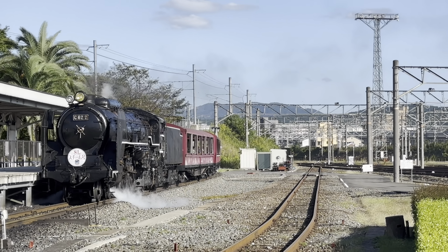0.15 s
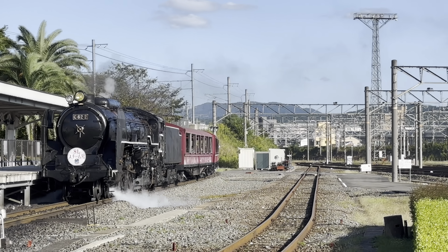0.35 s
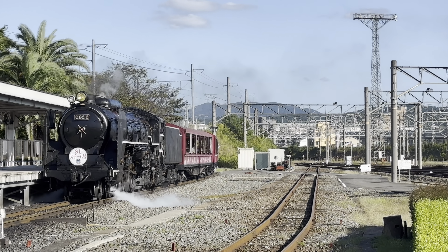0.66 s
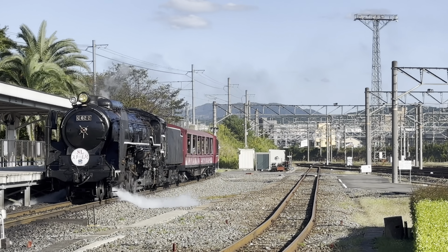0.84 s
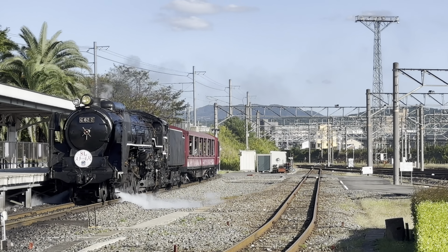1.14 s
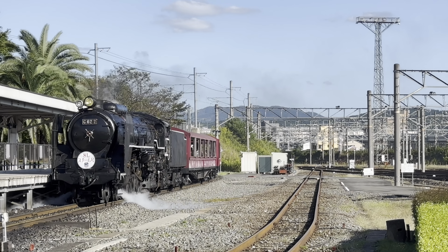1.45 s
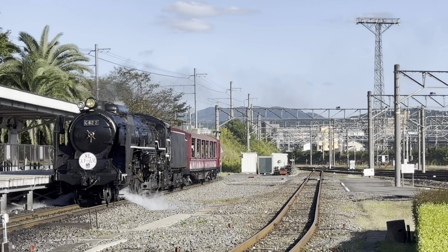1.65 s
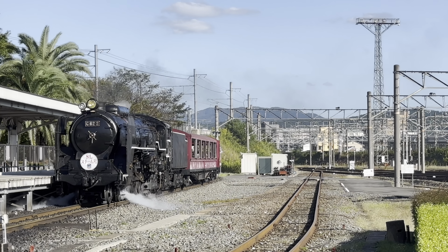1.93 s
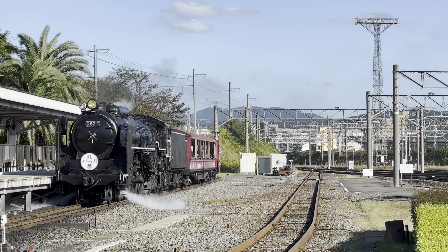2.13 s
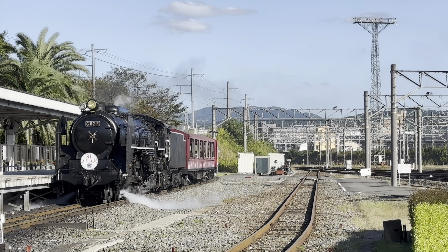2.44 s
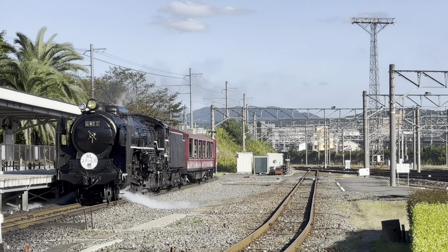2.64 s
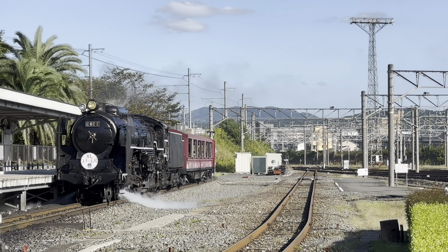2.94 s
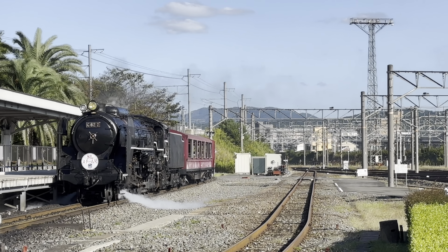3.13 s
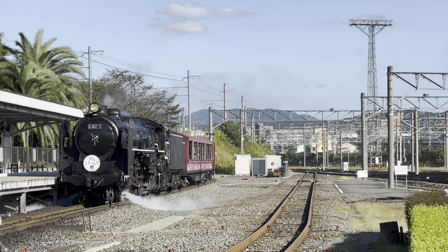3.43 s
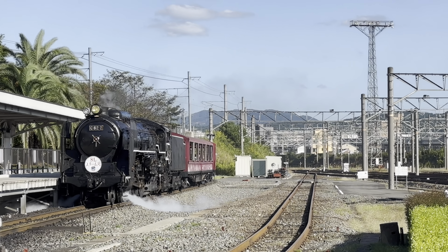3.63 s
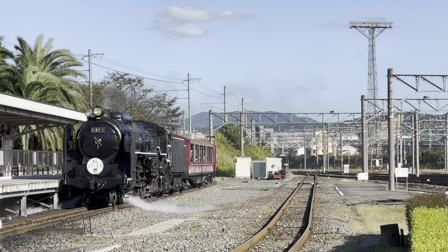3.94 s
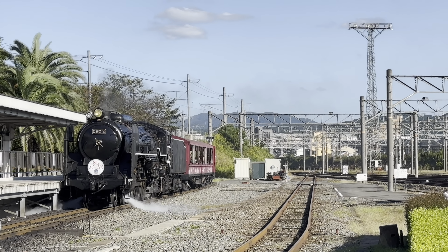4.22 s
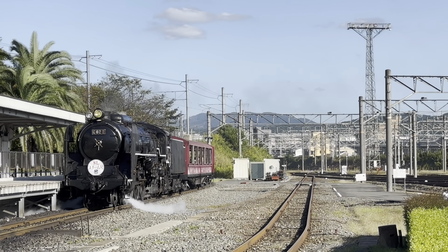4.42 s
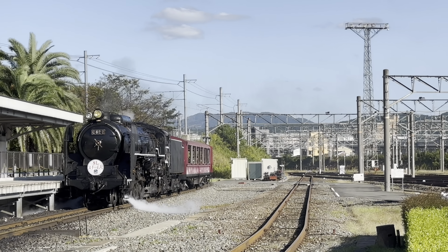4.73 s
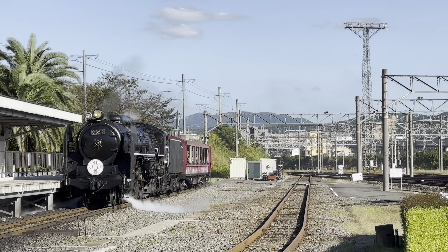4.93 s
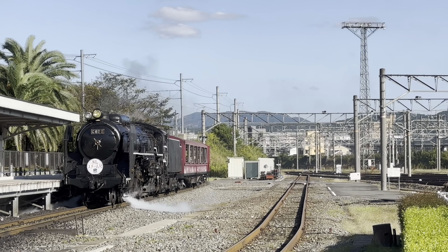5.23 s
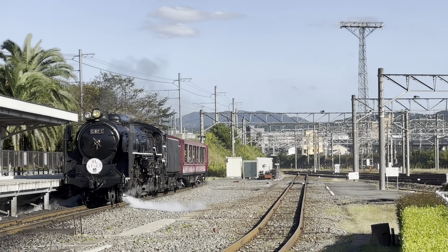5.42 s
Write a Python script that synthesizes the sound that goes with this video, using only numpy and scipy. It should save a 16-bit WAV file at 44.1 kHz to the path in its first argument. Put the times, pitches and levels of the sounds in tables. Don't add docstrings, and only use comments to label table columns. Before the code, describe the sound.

Steady bright steam hiss from a slowly rolling locomotive outdoors, with irregular low wind thumps on the microphone growing stronger toward the end.

```python
import sys
import numpy as np
from scipy import signal
from scipy.fft import rfft, irfft
from scipy.io import wavfile
from scipy.ndimage import uniform_filter1d

SR = 44100
rng = np.random.default_rng(int(sys.argv[2]) if len(sys.argv) > 2 else 0)


def log_audio(samples):
    frames = np.atleast_2d(samples).T
    limited = np.clip(frames, -1, 1)
    pcm = np.round(limited * 32767).astype(np.int16)
    wavfile.write(sys.argv[1], SR, pcm)


def nominal_scale(level):
    x = np.asarray(level, float) / 20
    return 10 ** x


N = 245725

# start in seconds, length in seconds, slap level in dB, rumble level in dB.
GUSTS = [(0.072, 0.017, -45, -25.5), (0.715, 0.083, -33, -28), (0.853, .025, -37.5, -38),
         (0.96, 0.017, -43, -37), (1.103, 0.0485, -36, -30), (1.441, 0.03, -44, -28),
         (1.559, 0.013, -30.5, -29), (2.028, 0.028, -35.5, -38), (2.102, 0.01, -35.5, -32.5),
         (2.191, .035, -34, -31), (2.472, 0.011, -30, -31), (2.601, 0.02, -39, -30),
         (2.727, 0.023, -41.5, -40), (3.171, 0.086, -41.5, -41), (3.48, 0.039, -39, -46),
         (3.601, 0.0945, -33, -22.5), (3.79, 0.14, -27.5, -15.5), (3.947, 0.051, -29, -25.5),
         (4.167, 0.085, -37, -28), (4.289, .065, -39.5, -30.5), (4.401, 0.012, -32, -39),
         (4.548, 0.13, -29, -25), (4.713, 0.039, -27.5, -24), (4.803, 0.023, -34.5, -27),
         (4.917, .06, -28.5, -25), (5.07, .03, -29.5, -26), (5.215, 0.025, -20, -16),
         (5.296, 0.043, -24, -19.5), (5.382, .035, -37, -23), (5.458, .065, -25, -13.5)]


def evened(x):
    return x / np.sqrt(np.mean(x ** 2) + 1e-20)


def read(points, hz):
    f, value = np.transpose(points)
    return np.interp(np.log(hz + 1), np.log(f + 1), value)


def smoothed(x, size, axis=-1):
    return uniform_filter1d(uniform_filter1d(x, size, axis=axis), size, axis=axis)


def lumps(seconds):
    return evened(smoothed(rng.standard_normal(N), max(int(seconds * SR), 1)))


def add(mix, s, sound):
    part = mix[:, round(s * SR):][:, :sound.shape[1]]
    part += sound[:, :part.shape[1]]


def steam(patchy_db=1.28, flicker_db=0.76, level_db=4.0):
    # time in seconds, strength in dB, spit in dB, whistle in dB.
    jet = [(0, -31, 0, -0.5), (.14, -32, 3.5, -1), (.24, -32, -3, -3), (.45, -31, -9, -0.5),
           (.75, -31.5, -2.5, -2.5), (1.01, -30.5, 2.5, -0.5), (1.09, -32.5, -4.5, 0), (1.6, -32, -9.5, 1),
           (2.1, -30.5, -8, -2), (2.51, -33, -4, -1), (2.8, -30.5, -12, -1.5), (2.99, -32, -7.5, -4),
           (3.09, -32, -10.5, -1.5), (3.48, -30.5, -10, -1.5), (4.3, -34, -11, -0.5), (4.98, -34.5, -8, -2),
           (5.38, -37.5, -7.5, -2), (5.57, -36, -10.5, -1.5)]
    zone_hz = [3000, 6000, 9000, 14000]
    spit_share = [0, 0.084, 0.52, 1.02]
    whistle_share = [0, 1.48, 0.47, 0.72]
    # pitch in Hz, level in dB per Hz.
    colour = [(250, -15), (600, -17), (1100, -14), (1450, -11), (1750, -4.5), (2200, -5), (2900, -1.5),
              (4600, -6.5), (6000, -3), (7300, -2), (8500, -7.5), (10800, -7.5), (13000, -8),
              (15500, -12.5)]
    # pitch in Hz, lead of the left channel in radians.
    channel_turn = [(1000, -.3), (1550, -1.9), (1850, -.45), (2300, .45), (3000, .9), (3900, .35), (6000, .2),
                    (6900, .95), (7450, 3.14), (8400, 6.1), (9000, 5.5), (10500, 3.45), (12100, 2.7),
                    (14000, .2)]
    # pitch in Hz, likeness from 0 to 1.
    channel_same = [(300, .9), (1100, .75), (1450, .5), (1900, .97), (5000, .995), (9500, .98), (15000, .995)]
    wander = .2

    frames, hz = N // 128 + 5, np.fft.rfftfreq(512, 1 / SR)
    t = np.arange(frames) * 128 / SR
    a, b, c, d, patches, drift = rng.standard_normal((frames, 257, 6)).T
    patches = evened(uniform_filter1d(uniform_filter1d(patches, size=7, axis=0), size=20, axis=1))
    drift = evened(uniform_filter1d(uniform_filter1d(drift, size=12, axis=0), size=25, axis=1))

    s, body_db, spit_db, whistle_db = np.transpose(jet)
    zones = np.outer(spit_share, np.interp(t, s, spit_db - spit_db.mean()))
    zones = zones + np.outer(whistle_share, np.interp(t, s, whistle_db - whistle_db.mean()))
    place = np.interp(np.log(hz + 1), np.log(zone_hz), np.arange(len(zones)))
    weights = np.maximum(1 - abs(place[:, None] - np.arange(len(zones))), 0)
    flicker = lumps(0.025)[np.minimum(np.arange(frames) * 128, N - 1)]
    flicker = flicker * np.clip(hz / 9000, 0, 1)[:, None]
    colour_db = read(colour, hz)
    field_db = colour_db[:, None] + weights @ zones + patchy_db * patches + flicker_db * flicker
    middle = (hz > 1800) & (hz < 4500)
    unit = np.sqrt(np.sum(nominal_scale(colour_db[middle]) ** 2) * 4 * 1.5)

    same = np.clip(read(channel_same, hz), 0, 1)[:, None]
    left = a + 1j * b
    right = same * left + np.sqrt(1 - same ** 2) * (c + 1j * d)
    turn = read(channel_turn, hz)[:, None]
    turn = turn + wander * drift * abs(np.sin(turn / 2)) ** .5
    half_turn = np.exp(.5j * turn)
    z = np.array([left * half_turn, right / half_turn])
    z *= nominal_scale(field_db + np.interp(t, s, body_db) + level_db) / unit
    return 2 * signal.istft(z, nperseg=512, noverlap=384)[1][:, :N]


def at_ports(both, differ):
    apart = .28
    return np.array([both + apart * differ, both - apart * differ])


def eddies(turns=1.3, thud_trim_db=-2.0, count=12, size=4096):
    # pitch in Hz, level in dB per Hz.
    thud = [(30, -41), (55, -16), (90, 1), (150, 3), (220, -20.5), (350, -50), (900, -100)]
    # pitch in Hz, level in dB per Hz.
    slap = [(120, -14), (200, 7), (330, 7.5), (480, -14), (700, -68), (1500, -100)]
    # pitch in Hz, level in dB per Hz.
    snap = [(250, -39), (420, 4), (650, -1), (950, -10.5), (1400, -29), (2500, -100)]

    hz, out = np.fft.rfftfreq(size, 1 / SR), np.zeros((2, N))
    lead = .03
    sweep = -2 * np.pi * (turns * np.log(hz + 20) + hz * (lead - turns / 350))
    rows = shed()
    chance = rng.uniform(-1, 1, (len(rows), 3, count))
    for (s, slap_db, ms, bright_db, thud_db, alive), (when, *sizes) in zip(rows, chance):
        if not alive:
            continue
        delay = when ** 3 * ms * 1.59 / 1000
        kicks = np.exp(-2j * np.pi * hz[:, None] * delay)
        kicks = kicks * (1.15 - abs(when))
        z = np.array(sizes) @ kicks.T * np.exp(1j * sweep)
        low_db = slap_db - 10 * np.log10(1 + nominal_scale(bright_db) ** 2)
        for shape, db in ((thud, thud_db + thud_trim_db), (slap, low_db), (snap, low_db + bright_db)):
            part = irfft(z * nominal_scale(read(shape, hz)), size)
            peak = np.sqrt(uniform_filter1d(part ** 2, size=300).max(1, keepdims=True))
            both, differ = nominal_scale(db) * part / peak
            add(out, s - lead, at_ports(both, differ))
    return out


def shed(count=11):
    # time in seconds, slap level in dB, brightness in dB, thud in dB.
    slaps = [(.754, -33, 12, -39), (1.105, -31.5, 0, -36), (1.468, -28.5, -24, -26.5),
             (2.602, -31, -14, -28), (3.609, -20, -18, -41), (3.627, -37, 9.5, -17.5),
             (3.845, -16.5, -11, -22), (3.965, -21.5, -15, -30), (4.282, -22.5, -7.5, -25),
             (4.567, -24.5, 3, -21), (4.606, -21.5, -5, -24), (4.624, -22, -3, -39),
             (4.723, -22.5, -7, -41), (4.929, -22.5, -4, -20), (5.232, -17, 2.5, -18.5),
             (5.308, -21, 7, -21), (5.33, -21, -0.5, -17.5), (5.377, -22, -2.5, -22.5),
             (5.481, -16, -13, -20), (5.494, -9.5, -3, -19.5), (2.315, -41.5, 0, -39),
             (3.683, -33, -6, -22), (3.833, -27, -9, -21), (3.905, -22.5, -7, -28), (4.592, -25, 4, -34),
             (4.952, -31, -4, -31), (5.028, -38, -10, -29), (5.132, -34, -8, -23), (5.474, -15, -2, -19),
             (5.527, -27, -6, -30)]
    gap_s, eddy_ms, slap_ms = .012, 7.12, 2.41
    scatter_db, taper_db, peak = 3.5, -14.5, 0.27
    shine_db, shine_scatter_db, deep_db = -9, 1.5, -5.5

    # time in seconds, slap in dB, length in ms, brightness in dB, thud in dB, 1 if it sounds.
    rows = []
    chance = rng.uniform(-1, 1, (len(GUSTS), 4, count))
    for (start, length, slap_db, rumble_db), (late, size, shine, deep) in zip(GUSTS, chance):
        late = .25 * late * (np.arange(count) > 0)
        after = (np.arange(count) + late) * gap_s
        taper = taper_db * (after / length - peak) ** 2
        train = [
            start + after,
            slap_db + taper + scatter_db * size,
            eddy_ms + 0 * after,
            shine_db + shine_scatter_db * shine,
            rumble_db + deep_db + taper + scatter_db * deep,
            1 * (after < length),
        ]
        rows += list(np.transpose(train))
    return rows + [(s, db, slap_ms, bright_db, thud_db, 1) for s, db, bright_db, thud_db in slaps]


def breeze(lumpy_db=1.5, flutter_db=4.5, steady=0.61, trim_db=-2.5):
    # pitch in Hz, level in dB per Hz.
    rumble = [(20, -30), (33, -31), (50, -3), (85, -6.5), (120, -13.5), (200, -19), (400, -39), (900, -100)]
    # pitch in Hz, level in dB per Hz.
    flutter = [(60, -38), (120, -3.5), (250, -6), (400, -16.5), (700, -13.5), (1500, -100)]

    t, hz = np.arange(N) / SR, np.fft.rfftfreq(N, 1 / SR)
    out = np.zeros((2, N))
    rumble_db = np.interp(t, t[::64], pressure(t[::64]))
    rumble_lumps = lumpy_db * lumps(0.039)
    flutter_lumps = -12.5 + flutter_db * lumps(0.018)
    for shape, level_db in ((rumble, rumble_lumps), (flutter, flutter_lumps)):
        air = evened(irfft(rfft(rng.standard_normal((2, N))) * nominal_scale(read(shape, hz)), N))
        power = smoothed(air ** 2, 1200)
        both, differ = air / (power + 0.06) ** (steady / 2)
        out += nominal_scale(rumble_db + level_db + trim_db) * at_ports(both, differ)
    return out


def pressure(t):
    # time in seconds, level in dB.
    wind = [(0, -19), (.04, -45), (.16, -51), (.31, -38), (.43, -46), (.5, -34.5), (.67, -43.5), (1.0, -35),
            (1.08, -52), (1.33, -38), (1.64, -42), (1.9, -53), (1.96, -39.5), (2.9, -43.5), (3.36, -43),
            (3.45, -39.5), (4.15, -40), (5.57, -32)]
    swell_db_s, ebb_db_s, crest = 400, 291, 0.72
    power = nominal_scale(np.interp(t, *np.transpose(wind))) ** 2
    for start, length, slap_db, rumble_db in GUSTS:
        since = t - start - crest * length
        power = power + nominal_scale(rumble_db + np.minimum(swell_db_s * since, -ebb_db_s * since)) ** 2
    return 10 * np.log10(power)


def scene():
    return steam() + eddies() + breeze()


def band_limit(x):
    return signal.sosfilt(signal.butter(12, 15750, fs=SR, output="sos"), x)


def record(dry):
    knee, ceiling = .5, .95
    room = ceiling - knee
    pressed = np.sign(dry) * (knee + room * np.tanh((abs(dry) - knee) / room))
    held = np.where(abs(dry) > knee, pressed, dry)
    return band_limit(held)


dry = scene()
out = record(dry)
log_audio(out)
```